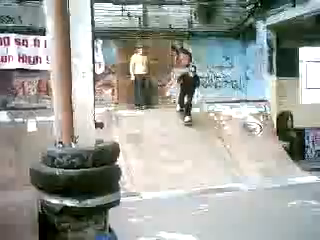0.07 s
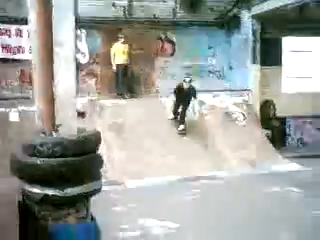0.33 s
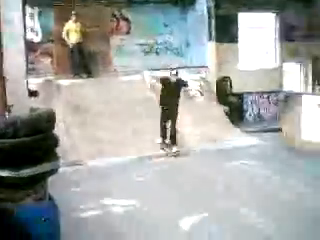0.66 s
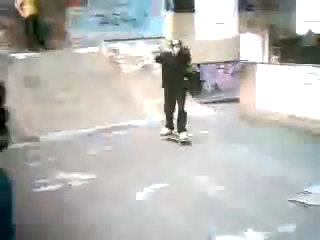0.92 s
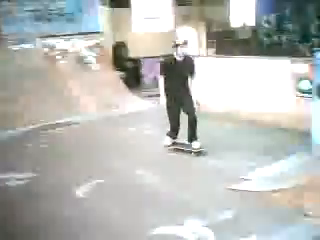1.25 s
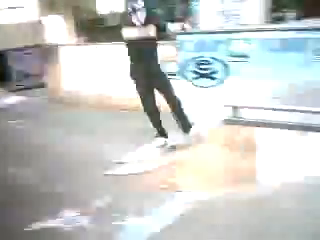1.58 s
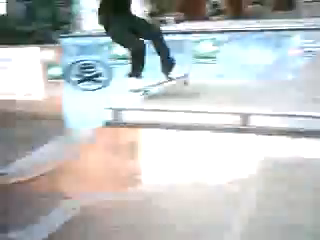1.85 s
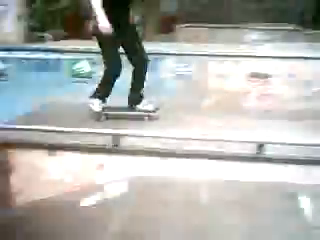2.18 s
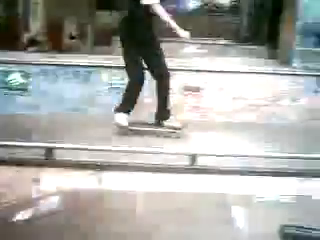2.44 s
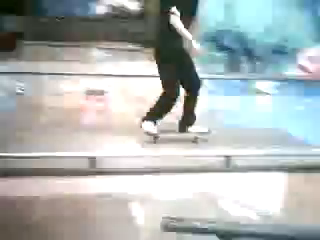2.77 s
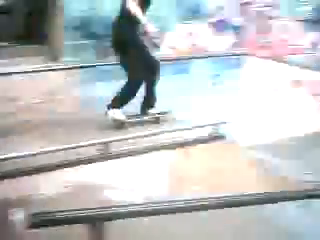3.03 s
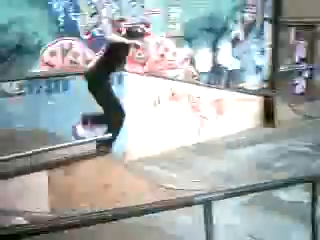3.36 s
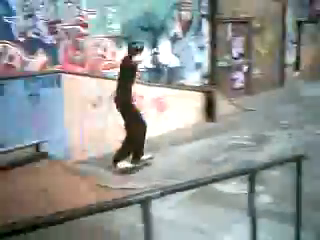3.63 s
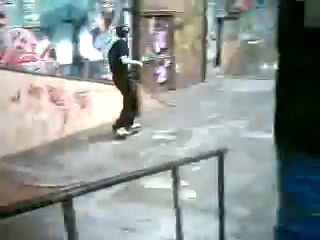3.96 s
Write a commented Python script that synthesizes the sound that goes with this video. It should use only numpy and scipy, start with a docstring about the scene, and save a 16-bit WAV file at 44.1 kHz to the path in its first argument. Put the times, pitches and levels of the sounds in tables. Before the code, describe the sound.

A skateboard rolls down a bank and over concrete with a low rumble. It clacks over a steel plate, thumps onto a hollow wooden ledge, rumbles along it and clatters off, echoing in a large indoor skatepark.

```python
"""Skateboard wheels roar down a bank and over concrete in a large hall. The board clacks over a steel
ramp plate, thumps onto a hollow wooden ledge, rumbles along it and drops off over a second plate.
The roar is countless small bumps, coloured by each surface. Blows are bursts of noise that hang in
the hall's long echo, while the plate, the trucks and the plywood box ring at their own modes."""
import sys
import numpy as np
from scipy import signal
from scipy.fft import rfft, irfft, next_fast_len
from scipy.io import wavfile
from scipy.ndimage import map_coordinates

SR = 44100
rng = np.random.default_rng(int(sys.argv[2]) if len(sys.argv) > 2 else 0)


def to_wav(sig):
    """Store sig (one row per channel, or 1-D mono) as 16-bit WAV at the path in sys.argv[1].

    Samples outside -1..1 are clipped; the rate is SR.
    """
    pcm = np.clip(np.atleast_2d(sig), -1, 1) * 32767
    pcm = np.round(pcm).astype(np.int16)
    wavfile.write(sys.argv[1], SR, pcm.T)  # frames by channels


N = 176400


def amp(db):
    """Decibels to gain."""
    return 10 ** (np.asarray(db) / 20)


def unit(x):
    """Scale to rms 1."""
    return x / np.sqrt(np.mean(x ** 2) + 1e-20)


def along(points, hz):
    """Read a curve of (Hz, value) points on a log frequency axis."""
    freqs, values = np.transpose(points)
    return np.interp(np.log(hz + 1), np.log(freqs + 1), values)


def curves(rows):
    """Automation: one value per sample for each column after the time."""
    times, *columns = np.transpose(rows)
    return [np.interp(np.arange(N) / SR, times, column) for column in columns]


def wobble(knots_per_s):
    """A smooth random curve."""
    return map_coordinates(rng.standard_normal(2048), [np.arange(N) * knots_per_s / SR], mode="wrap")


def filtered(x, response):
    """Equalise x with a gain given as a function of Hz."""
    size = next_fast_len(len(x) + 8192)
    return irfft(rfft(x, size) * response(np.fft.rfftfreq(size, 1 / SR)), size)[:len(x)]


def add(track, start_s, x):
    """Mix x into the track."""
    i = round(start_s * SR)
    track[i:i + len(x)] += x[:N - i]


def envelope(t, t60, attack_s):
    """A quick rise and an exponential decay of 60 dB in t60 seconds."""
    return (1 - np.exp(-t / attack_s)) * np.exp(-np.log(1000) * t / t60)


def burst(colour, t60, attack_s):
    """A blow: densely packed resonances of one colour, dying together."""
    t = np.arange(SR // 3) / SR
    noise = filtered(rng.standard_normal(len(t)), lambda hz: amp(along(colour, hz)))
    return unit(noise) * envelope(t, t60, attack_s)


def ring(modes, length_s, scatter_db=2):
    """Decaying modes, struck a little differently each time."""
    t = np.arange(int(length_s * SR)) / SR
    hz, db, t60 = np.transpose(modes)[:, :, None]
    phase = 2 * np.pi * rng.random(hz.shape)
    gain = amp(db + scatter_db * rng.standard_normal(hz.shape))
    return (gain * envelope(t, t60, attack_s=.001) * np.sin(2 * np.pi * hz * t + phase)).sum(0)


def narrow_noise(centre_hz, width_hz):
    """Noise in one resonance, whose centre may move."""
    lowpass = lambda hz: 1 / (1 + (2 * hz / width_hz) ** 4)
    in_phase = unit(filtered(rng.standard_normal(N), lowpass))
    quadrature = unit(filtered(rng.standard_normal(N), lowpass))
    phase = 2 * np.pi * np.cumsum(centre_hz * np.ones(N)) / SR
    return in_phase * np.cos(phase) + quadrature * np.sin(phase)


# The hall's reverb time. Each row: frequency in Hz, t60 in seconds.
HALL_DECAY = [(60, 0.85), (250, 1.33), (1000, 2.07), (2000, 1.7), (4000, 0.96), (7000, 1.12)]


def in_hall(x, echo_db):
    """x followed by the hall's tail, a new one for each place of the board."""
    hz, t, spectrum = signal.stft(rng.standard_normal(2 * SR), SR, nperseg=256)
    decay = envelope(t, along(HALL_DECAY, hz)[:, None], attack_s=0.0057)
    tail = signal.istft(spectrum * decay, SR, nperseg=256)[1]
    response = amp(echo_db) * tail / np.linalg.norm(tail)
    response[0] += 1  # the direct sound
    return signal.fftconvolve(x, response)


# The wheels' thin whirr. Each row: time in seconds, level in dB, centre in Hz.
WHIRR = [(.085, -48, 1830), (.16, -53, 1830), (.3, -50, 1900), (.6, -52, 1870), (.8, -56, 1950),
         (1.1, -54, 1830), (1.57, -57, 1760), (1.7, -82, 1760)]
# Their rasp on reaching the flat concrete. Each row: time in seconds, level in dB.
RASP = [(.7, -68.5), (.78, -58), (.86, -57), (1.05, -62), (1.5, -70), (1.6, -80)]


def whirr_and_rasp():
    """The spinning wheels whirr, and rasp on the rough floor."""
    whirr_db, whirr_hz = curves(WHIRR)
    rasp_db, = curves(RASP)
    whirr = amp(whirr_db) * narrow_noise(whirr_hz, width_hz=210)
    rasp = amp(rasp_db) * narrow_noise(centre_hz=3580, width_hz=1700)
    return whirr + rasp


# Fader moves for the roar on the concrete, the ledge and the floor beyond.
# Each row: time in seconds, then the levels of deep rumble, bass, middle and treble in dB.
CONCRETE_LEVELS = [(.085, -45, -48.5, -45, -48), (.16, -46, -44, -52.5, -51.5),
                   (.175, -47, -39, -36, -43.5), (.3, -46.5, -43, -33, -41.5),
                   (.46, -48.5, -33.5, -35.5, -43.5), (.735, -47.5, -34.5, -35, -46.5),
                   (.79, -36, -28, -28.5, -42), (.95, -45.5, -35, -31.5, -45),
                   (1.2, -46, -40.5, -29.5, -46.5), (1.36, -55, -41, -36.5, -51),
                   (1.58, -58, -42, -36.5, -48), (1.8, -65, -61, -50, -57)]
LEDGE_LEVELS = [(1.6, -42, -33.5, -29.5, -63), (1.72, -35, -35, -22, -38.5),
                (1.9, -44.5, -27, -28.5, -40.5), (2.05, -45, -33.5, -31.5, -44),
                (2.14, -28.5, -24.5, -29, -44.5), (2.28, -40.5, -31.5, -34, -48),
                (2.44, -42, -31, -36, -50.5), (2.5, -47, -35, -38.5, -54), (2.9, -47, -39, -43.5, -59.5),
                (3.39, -49.5, -43, -52, -65.5), (3.6, -59.5, -40, -56, -70)]
FAR_FLOOR_LEVELS = [(3.392, -41.5, -40, -41, -49), (3.42, -49, -35.5, -38, -54.5),
                    (3.63, -43, -29.5, -38, -53.5), (3.72, -37.5, -27.5, -26.5, -46),
                    (3.83, -35, -36.5, -26.5, -41), (3.89, -45.5, -35.5, -31, -44),
                    (3.94, -46, -39.5, -29, -41.5), (4, -48, -33, -30.5, -47)]
# Each surface's tone within those bands. Each row: frequency in Hz, relative level in dB.
CONCRETE_COLOUR = [(15, -44), (25, -6), (37, -13.5), (69, 0.5), (119, 4.5), (209, -0.5), (351, 3), (575, 0),
                   (678, -1), (819, -10.5), (1010, -13.5), (1250, -21), (1780, -18.5), (2150, -27.5),
                   (3620, -39), (4070, -50), (4470, -41.5), (6520, -62.5), (7000, -71.5), (9100, -101),
                   (15400, -120)]
LEDGE_COLOUR = [(15, -42.5), (25, -10.5), (64, -5.5), (98, 1.5), (173, -3.5), (297, -9.5), (367, -10),
                (476, -12), (523, -15), (632, -16), (800, -24.5), (879, -25), (1340, -39), (1620, -35.5),
                (2370, -45), (4370, -50), (7000, -75), (9100, -105), (15400, -120)]
FAR_FLOOR_COLOUR = [(15, -33), (25, -5), (48, -8), (76, -9), (130, -0.5), (297, -3), (342, -1), (423, -4),
                    (523, 2), (819, -12), (1040, -17.5), (1310, -20.5), (1590, -26), (3700, -30),
                    (7000, -59.5), (9100, -85), (15400, -120)]
BAND_EDGES_HZ = [60, 250, 950]
BUMPS_PER_S, JUDDER_PER_S, JUDDER_DB = 900, 34, 0.12


def rolling(levels, colour, grit=0.71):
    """Wheels hit countless small bumps; the surface colours them and the board judders very slightly."""
    def bands(hz):
        lowpasses = [1 / (1 + (hz / edge) ** 8) for edge in BAND_EDGES_HZ]
        return np.diff(lowpasses, axis=0, prepend=0, append=1)

    bumps = unit((rng.random(N) < BUMPS_PER_S / SR) * rng.standard_normal(N))
    drive = grit * bumps + rng.standard_normal(N)
    roar = np.zeros(N)
    for k, db in enumerate(curves(levels)):
        band = filtered(drive, lambda hz: bands(hz)[k] * amp(along(colour, hz)))
        roar += amp(db) * unit(band)
    start, end = levels[0][0], levels[-1][0]
    contact, = curves([(start - .003, 0), (start, 1), (end, 1), (end + .1, 0)])
    return roar * contact * amp(JUDDER_DB * wobble(JUDDER_PER_S))


# The deck's modes. Each row: pitch in Hz, relative level in dB, t60 in seconds.
DECK_MODES = [(227, 5.5, 0.24), (1337, -1.5, 0.043), (1510, -2.5, 0.032), (2600, -16, .05),
              (2750, -16, .06)]


def deck_clonk(start_s=3.395, gain_db=-29):
    """The deck rings briefly as its wheels drop off the ledge."""
    out = np.zeros(N)
    add(out, start_s, amp(gain_db) * in_hall(ring(DECK_MODES, length_s=.5), echo_db=-9.5))
    return out


# The rider's weight pressing on the hollow box. Each row: start in seconds, level in dB, pitch in Hz.
THUDS = [(2.083, -24, 84), (2.14, -17.5, 45), (2.314, -19, 80), (2.349, -22, 108)]


def box_thuds():
    """Each push of the wheels bends the box's top, which swings a few times."""
    out, t = np.zeros(N), np.arange(SR // 3) / SR
    for start_s, db, hz in THUDS:
        swing = np.sin(2 * np.pi * hz * t) * envelope(t, t60=.2, attack_s=0.0076)
        add(out, start_s, amp(db) * swing)
    return out


# The body of the crack. Each row: centre in Hz, width in Hz, gain in dB.
CRACK_RESONANCES = [(1280, 850, 2.5), (3880, 2300, 0.5)]


def crack(start_s=1.7578, impulse_db=14.5, top_hz=5500):
    """One sharp dry crack at the top of the ramp: a hard impulse through two broad resonances."""
    def body(hz):
        return sum(amp(db) * (1j * hz * width / (centre ** 2 - hz ** 2 + 1j * hz * width)) ** 2
                   for centre, width, db in CRACK_RESONANCES)

    impulse = np.zeros(N)
    add(impulse, start_s, amp([impulse_db]))
    lowpass = signal.butter(6, top_hz, fs=SR, output="sos")
    return signal.sosfilt(lowpass, filtered(impulse, body))


# Hits on wood. Each row: start in seconds, level in dB, t60 in seconds, boom relative to the hit in dB.
KNOCKS = [(1.616, -16, 0.089, -6), (1.65, -20.5, 0.087, -14), (1.671, -14.5, .1, -7.5),
          (1.702, -17.5, 0.14, -9), (1.722, -19, 0.073, -11), (1.742, -16.5, 0.12, -4.5),
          (2.078, -22, .08, -3), (2.112, -17, 0.11, -5.5), (2.138, -22, 0.11, 2), (2.315, -25, 0.072, 6.5),
          (3.394, -25.5, .1, -4), (3.422, -33, .08, 3), (3.645, -21, 0.068, -9), (3.709, -28.5, 0.064, -5),
          (3.759, -34, 0.054, -1.5), (3.829, -21, 0.043, -14)]
# The woody knock and the hollow boom under it. Each row: frequency in Hz, relative level in dB.
WOOD_COLOUR = [(40, -26), (110, -4), (180, 0), (250, 2), (320, -5), (400, 4), (470, -6), (630, 0),
               (790, -15.5), (900, -9), (1200, -26.5), (2500, -27.5), (7000, -76)]
BOOM_COLOUR = [(20, -17.5), (42, -4), (58, -7), (78, -1.5), (112, 0), (150, -1), (250, -16), (600, -47.5),
               (2000, -85)]
# The plywood box's own ring. Each row: pitch in Hz, relative level in dB, t60 in seconds.
BOX_MODES = [(112.4, 1.5, 0.55), (249, 2, 0.4), (385, -2, 0.73), (412.4, 0, 1.1), (539, -1.5, 1.9),
             (614, 0, 0.75), (890, -15, .8)]


def wood_knocks(ring_db=-19.5):
    """Wheels knock on the plywood; the rider's weight makes the box boom and ring."""
    out = np.zeros(N)
    for start_s, db, t60, boom_db in KNOCKS:
        knock = burst(WOOD_COLOUR, t60, attack_s=0.0037)
        boom = amp(boom_db) * burst(BOOM_COLOUR, t60=0.13, attack_s=0.012)
        add(out, start_s, amp(db) * in_hall(knock + boom, echo_db=-2.5))
        add(out, start_s, amp(db + ring_db) * ring(BOX_MODES, length_s=0.94))
    return out


# Wheels and trucks hit steel. Each row: start in seconds, level in dB, t60 in seconds, echo send in dB.
CLACKS = [(1.57, -27, 0.038, -3), (1.577, -18, 0.03, 4.5), (1.595, -28, 0.059, 1), (1.634, -21.5, 0.068, 3),
          (1.649, -20, 0.1, -4.5), (1.664, -23, 0.077, 2), (1.719, -27.5, 0.045, -9), (2.117, -35, .04, -7),
          (2.643, -51, .012, -9), (3.64, -32, .2, -1), (3.664, -36, .08, 1), (3.706, -28, .08, 3),
          (3.72, -29, 0.16, -2), (3.733, -32, .05, -1), (3.757, -30, .04, -15), (3.824, -39, .03, -3)]
# The bright crash of each hit. Each row: frequency in Hz, relative level in dB.
CLACK_COLOUR = [(200, -14.5), (700, 9), (1100, -1), (1500, 1.5), (1900, 1), (2250, -3), (2500, -3),
                (2700, 3.5), (3050, -5), (3700, -3), (4400, -6.5), (5000, -19.5), (5600, -27),
                (6600, -30.5), (7200, -46.5)]
# The ring of trucks and plate. Each row: pitch in Hz, relative level in dB, t60 in seconds.
TRUCK_MODES = [(1470, -7.5, .05), (2650, -3.5, 0.073), (2770, -5, 0.057), (3050, -6.5, 0.051),
               (3395, -5.5, 0.047)]
PLATE_MODES = [(1497, -2, 1.2), (1610, 1.5, 1.1), (1795, -5, 1.8), (1930, -8.5, 1.4), (2067, -3.5, 2.3),
               (2330, -10.5, 1.3), (2471, -3, 0.68), (2600, 2.5, 0.69), (2784, 1.5, 0.45),
               (2880, -2.5, 1.2), (2950, -8, 1.2), (3390, -8, 1), (3600, -9.5, 1)]


def steel_clacks(truck_db=-1.5, plate_db=-31):
    """Each blow on steel is a bright crash, a short ring of the trucks and a faint long one of the plate."""
    out = np.zeros(N)
    for start_s, db, t60, echo_db in CLACKS:
        crash = burst(CLACK_COLOUR, t60, attack_s=.001)
        add(out, start_s, amp(db) * in_hall(crash, echo_db))
        trucks = amp(truck_db) * ring(TRUCK_MODES, length_s=1)
        plate = amp(plate_db) * ring(PLATE_MODES, length_s=1)
        add(out, start_s, amp(db) * (trucks + plate))
    return out


def scene():
    """The whole ride in mono: a bed of wheel noise with the hits on top."""
    concrete = rolling(CONCRETE_LEVELS, CONCRETE_COLOUR)
    ledge = rolling(LEDGE_LEVELS, LEDGE_COLOUR)
    far_floor = rolling(FAR_FLOOR_LEVELS, FAR_FLOOR_COLOUR)
    wheels = concrete + ledge + far_floor + whirr_and_rasp()
    return (wheels + steel_clacks() + wood_knocks() + box_thuds() + crack() + deck_clonk())[None]


START_S, FADE_IN_S, TOP_HZ = .086, .001, 7100


def record(dry):
    """The sound cuts in abruptly, and a steep low-pass takes off the top."""
    gate = np.clip((np.arange(N) / SR - START_S) / FADE_IN_S, 0, 1)
    return filtered(dry[0] * gate, lambda hz: 1 / (1 + (hz / TOP_HZ) ** 80))[None]


dry = scene()
out = record(dry)
to_wav(out)
```